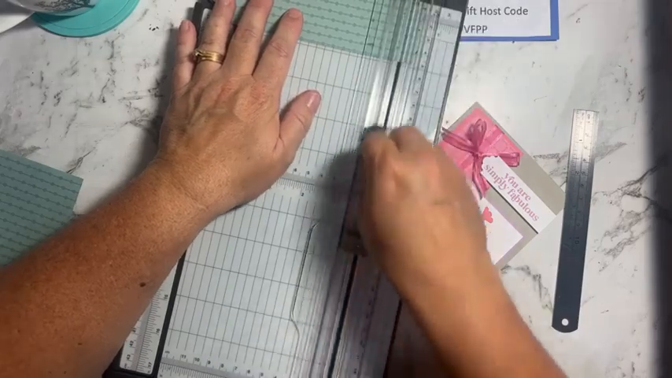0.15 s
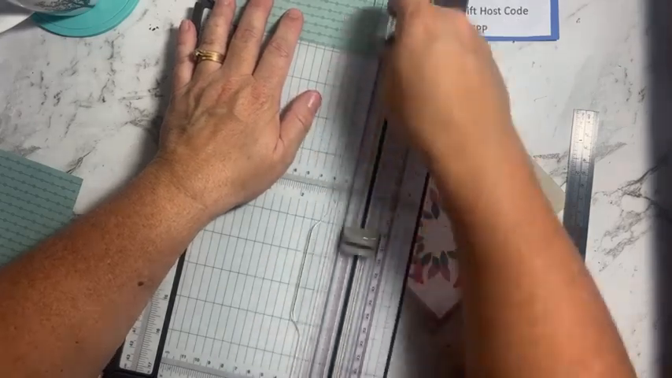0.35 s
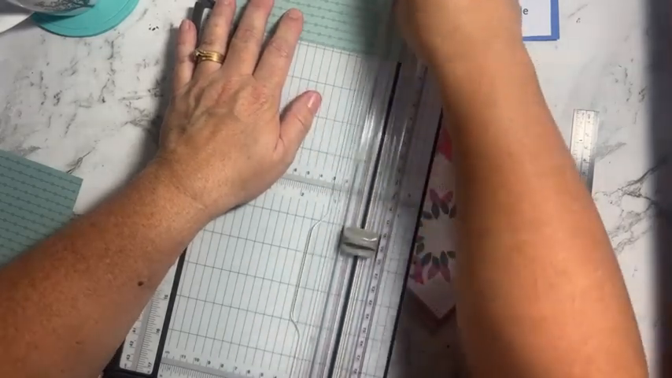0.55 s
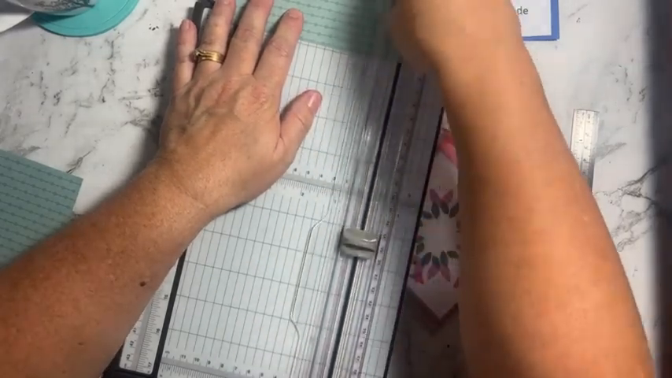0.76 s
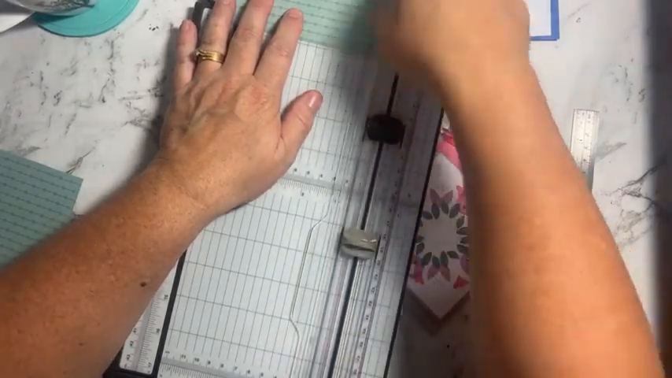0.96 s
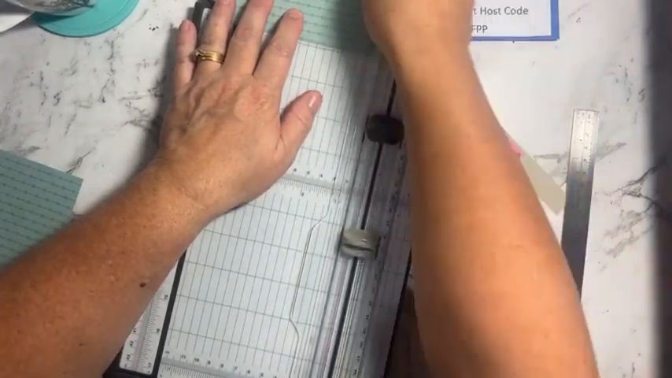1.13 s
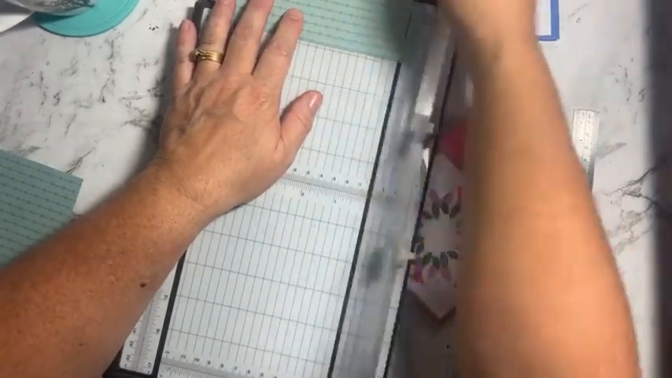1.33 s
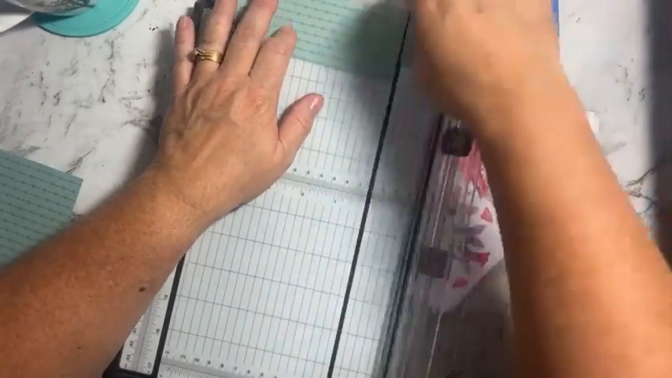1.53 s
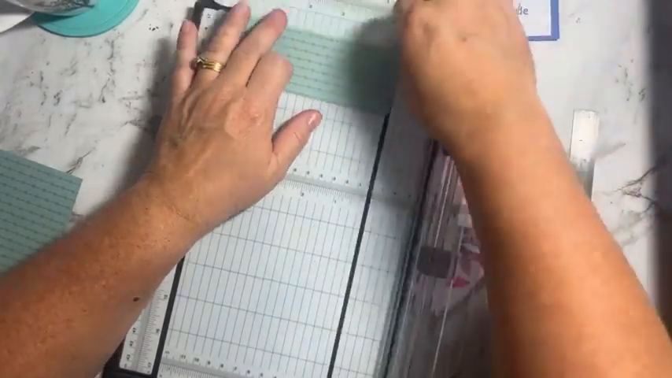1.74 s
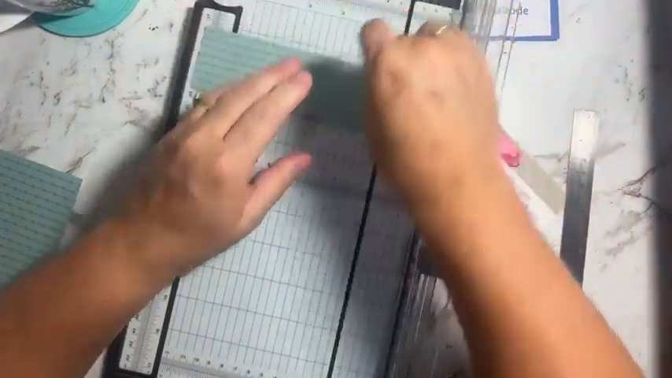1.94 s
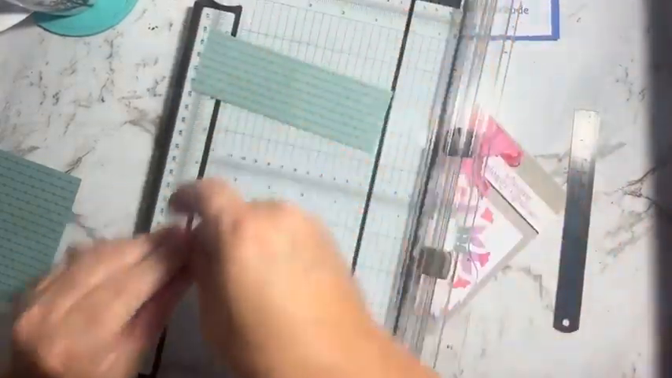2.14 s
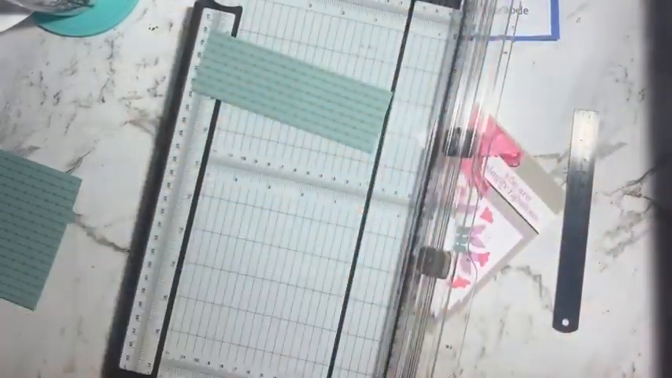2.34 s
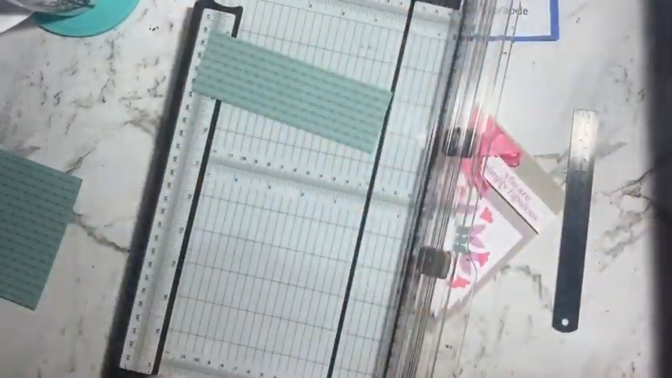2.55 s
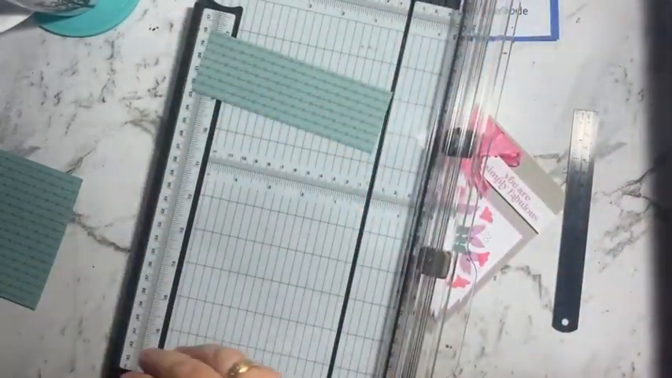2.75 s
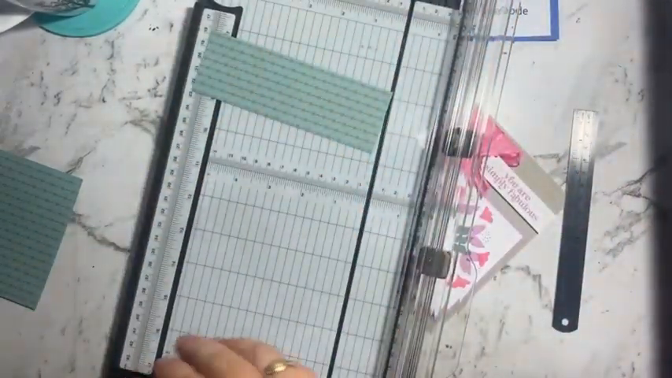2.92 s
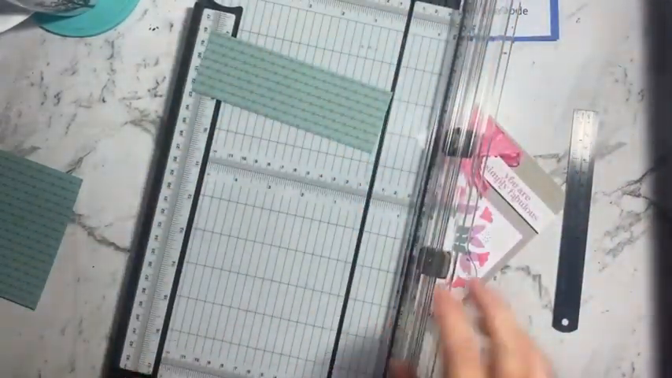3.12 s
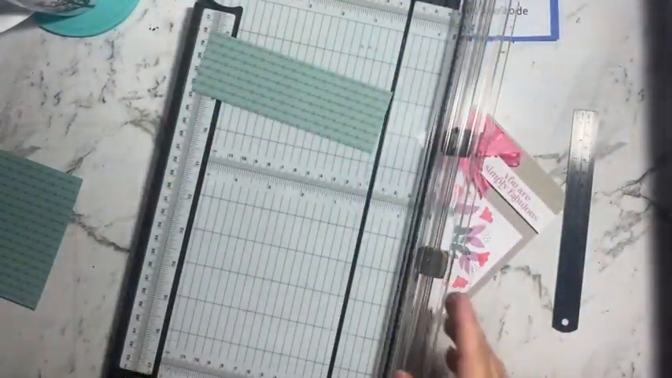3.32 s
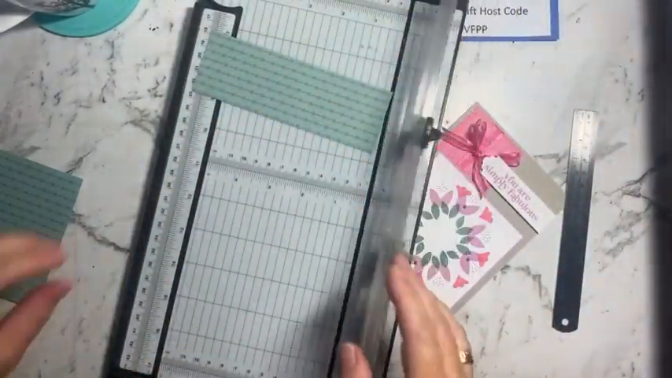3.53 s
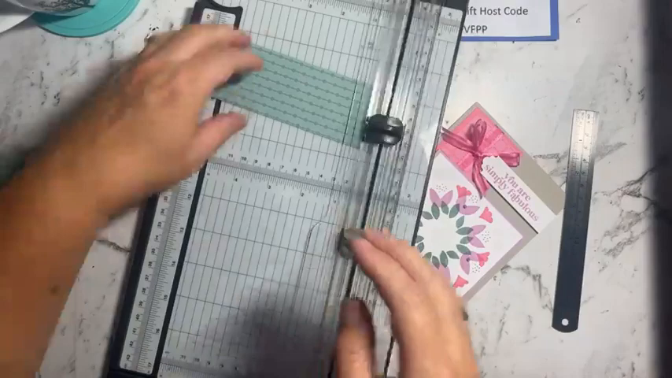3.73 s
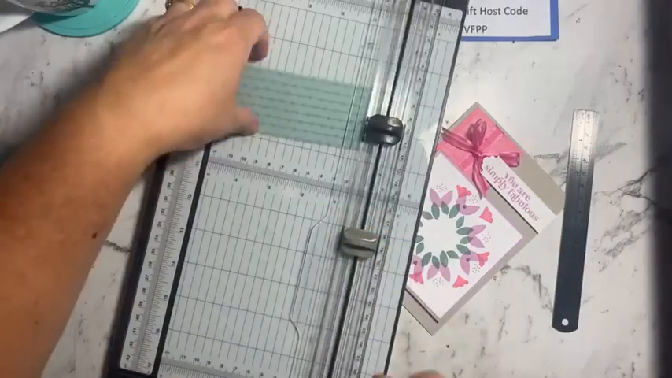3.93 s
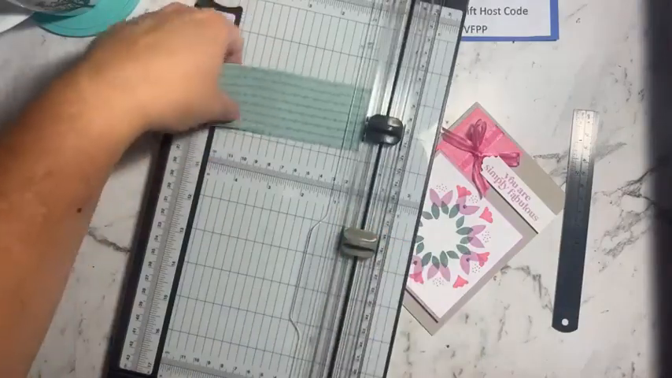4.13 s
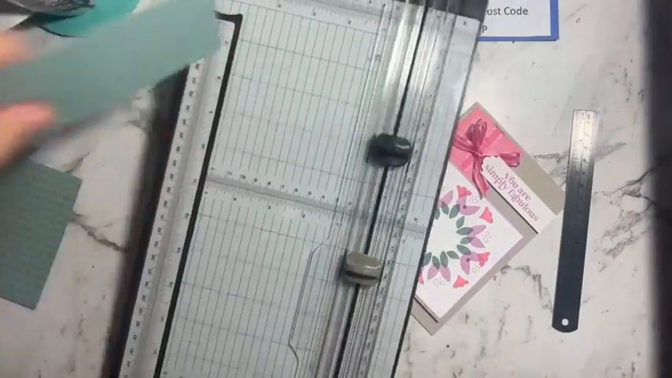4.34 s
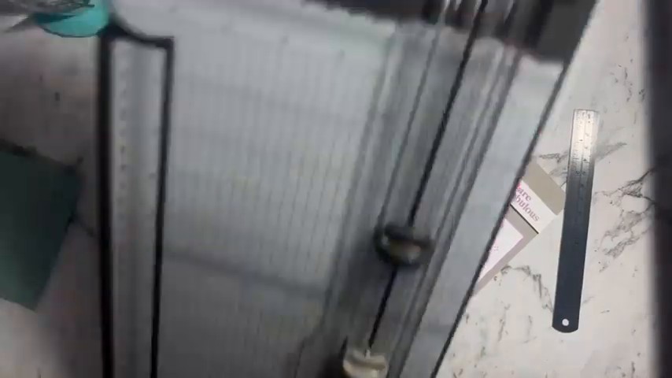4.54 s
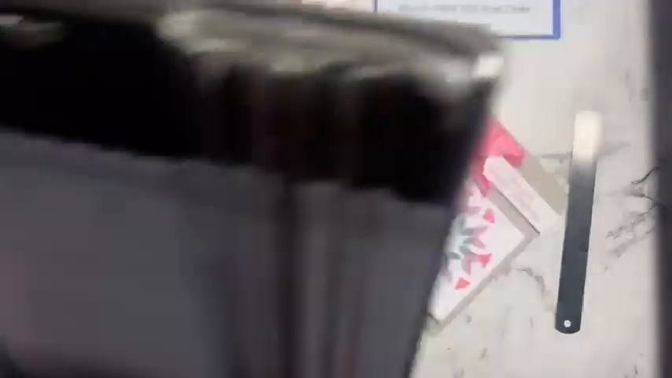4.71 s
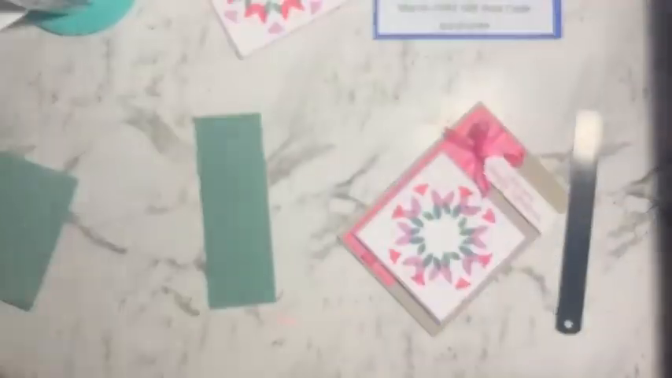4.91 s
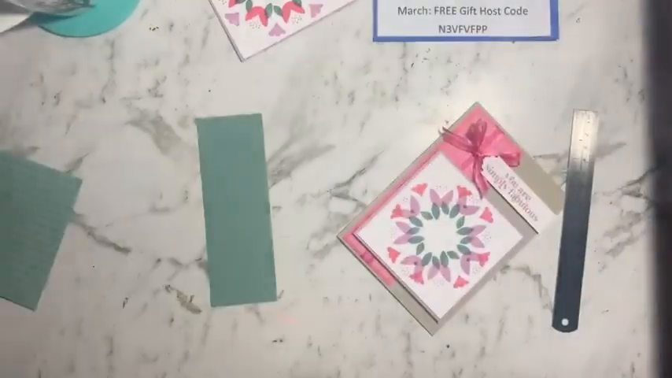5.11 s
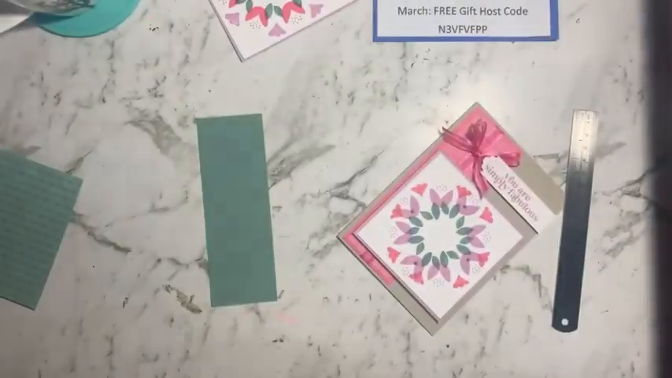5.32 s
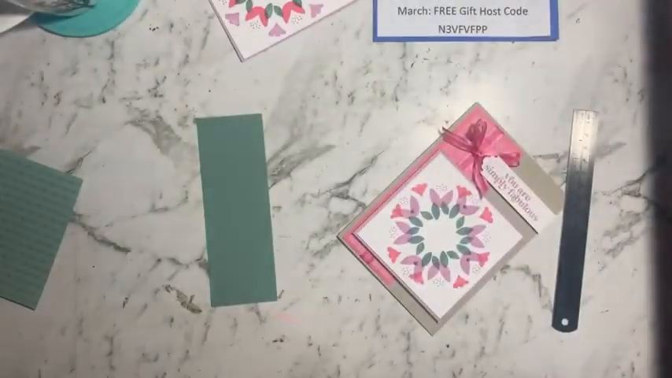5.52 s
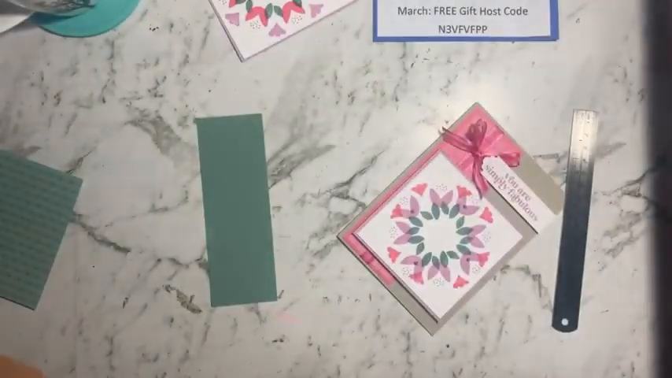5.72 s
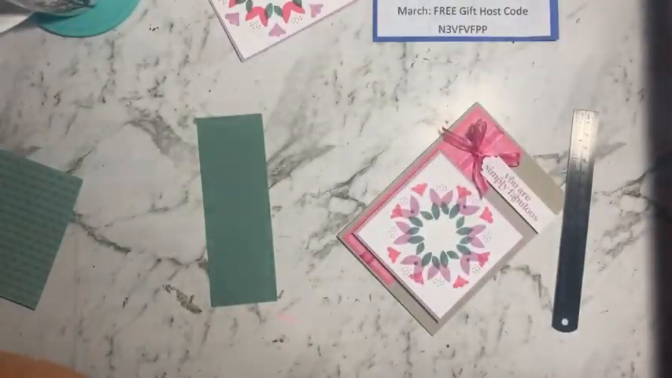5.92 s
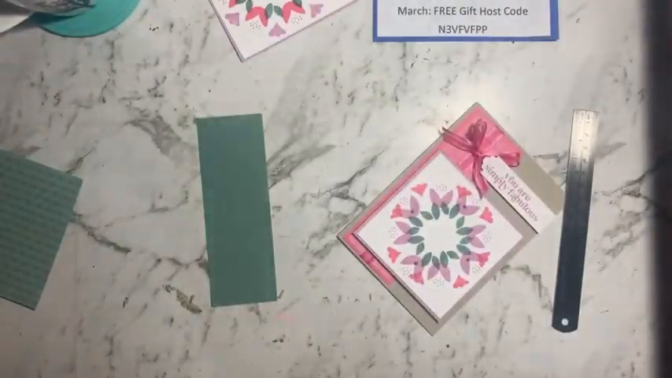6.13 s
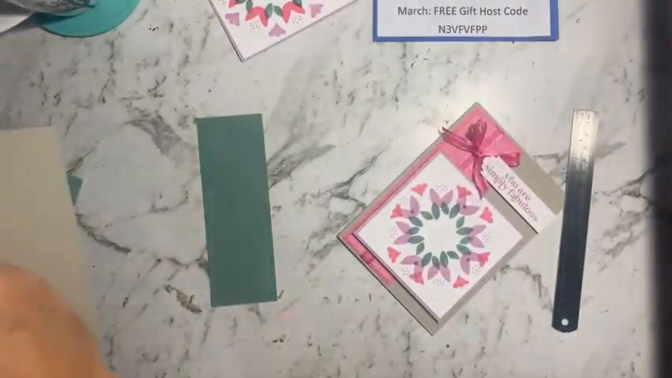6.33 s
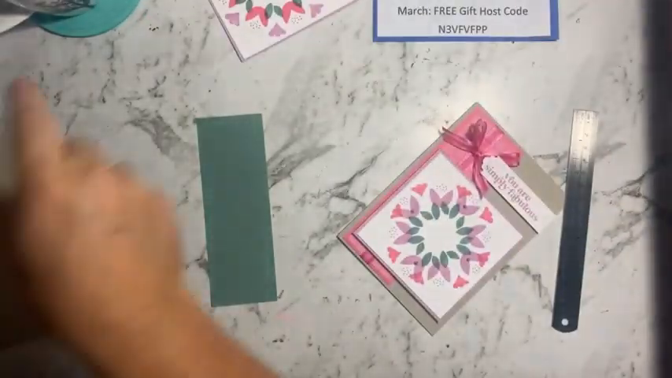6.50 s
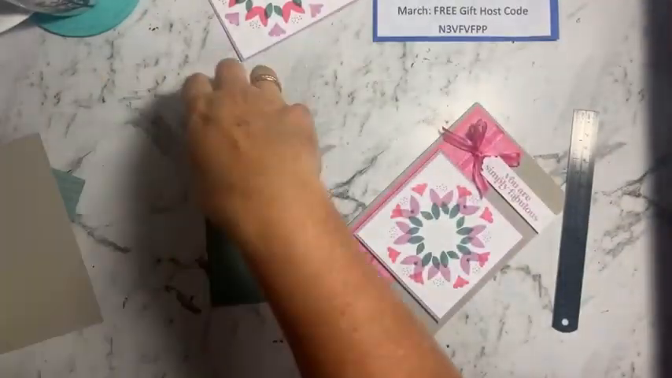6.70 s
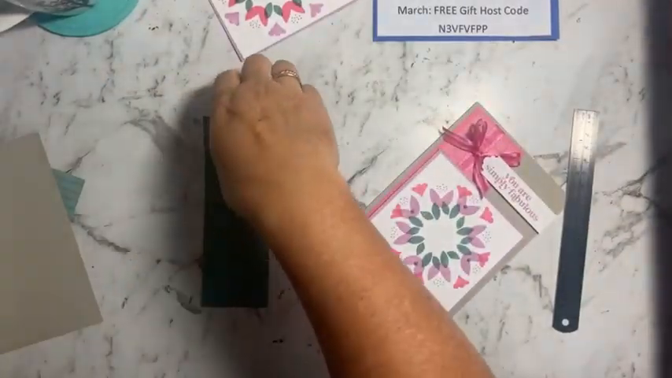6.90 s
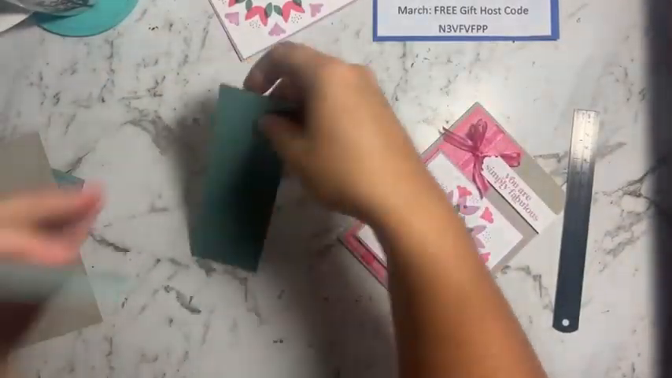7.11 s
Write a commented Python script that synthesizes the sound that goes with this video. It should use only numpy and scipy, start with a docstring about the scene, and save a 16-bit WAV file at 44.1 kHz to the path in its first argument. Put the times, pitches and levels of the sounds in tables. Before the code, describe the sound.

A trimmer blade rasps briefly through cardstock amid plastic clicks, then a sharp clack, bright snaps and loud hollow knocks on a desk.

```python
"""Paper trimmer on a desk

A small room with a faint fan hum: the blade slides up its rail and rasps through cardstock, fibre by fibre.
The plastic rail is lifted, squeaks on its hinge in unsteady tones and slaps shut; the strip is pulled away.
The trimmer is carried aside, clicks, and is put down with loud hollow knocks; hands gather the card.
Blows and friction are coloured grains that ring the board; a small microphone takes it all in.
"""
import sys
import numpy as np
from scipy import signal
from scipy.fft import rfft, irfft
from scipy.io import wavfile

SR = 44100
rng = np.random.default_rng(int(sys.argv[2]) if len(sys.argv) > 2 else 0)


def int16_out(signal):
    """Quantize to a 16-bit WAV file."""
    q = np.round(np.clip(np.atleast_2d(signal).T, -1, 1) * 32767)
    wavfile.write(sys.argv[1], SR, q.astype(np.int16))


N = 320166
TIME = np.arange(N) / SR

# blows on the plastic: (time [s], level [dB], bass [dB], hollow body [dB], strongest ring [Hz],
# rattle t60 [s], first crack [dB]); bass and body stand against the level, before a common trim
BLOWS = [(0.046, -28, -30.5, -28, 4500, 0.028, 2), (0.111, -44.5, -5, -4.5, 1200, 0.19, 7),
         (0.477, -31, -16.5, -2.5, 3670, 0.055, -1), (0.6745, -25, -19.5, -11.5, 4340, 0.07, 2.5),
         (0.7228, -29, -20, -5.5, 2720, 0.11, -2), (0.9108, -40.5, -11, 4, 890, 0.086, -5),
         (0.9887, -41, -6.5, -4, 3900, 0.093, 10), (1.035, -30, -35, -33, 3600, 0.029, 2),
         (1.0608, -21.5, -32, -3, 2700, 0.05, -10.5), (1.161, -32.5, -16, -3, 2430, 0.16, 1.5),
         (1.308, -32.5, -27, -8.5, 1200, 0.059, -3), (1.318, -30, -29, -19, 3300, 0.07, -4),
         (1.601, -41.5, -29, -13, 2240, 0.28, -2), (1.621, -17.5, -26, -12.5, 3120, 0.06, -17),
         (1.823, -35, -12.5, 3, 1340, 0.077, 5), (2.039, -54, -27, 4.5, 1960, 0.13, 6.5),
         (3.2, -45.5, -18, -12, 1170, 0.3, -9), (3.228, -38.5, -31, -6, 1140, 0.13, 2),
         (3.413, -55, -10, 1, 2000, 0.3, -9), (3.7381, -7, -30.5, -9, 3520, 0.038, 0.5),
         (3.746, -4.5, -30, -15, 5640, 0.11, 5), (4.168, -34.5, -18, -12.5, 1070, 0.071, -13),
         (4.298, -33, -21, -13, 1196, .065, 0.5), (5.561, -26.5, -35, -13, 3400, 0.13, 1),
         (5.877, -42, -0.5, 8, 443, 0.13, -3), (6.2217, -16.5, -11.5, -5.5, 3550, 0.16, -2.5),
         (6.5047, -6.5, -14, -4, 3240, 0.13, 7.5), (6.556, -16, -23, -7.5, 5140, 0.14, 7.5),
         (6.7065, -7, -12.5, -4.5, 1266, 0.12, 7.5), (6.725, -10.5, -18, -10, 1600, 0.078, -3)]


def amp(db):
    """Decibels to gain."""
    return 10 ** (np.asarray(db) / 20)


def unit(x):
    """Scales to rms 1."""
    return x / np.sqrt(np.mean(x ** 2) + 1e-20)


def read(points, hz):
    """Reads a curve on a log-frequency axis."""
    f, value = np.transpose(points)
    return np.interp(np.log(hz + 1), np.log(f + 1), value)


def add(mix, s, sound):
    """Mixes a sound in at a time in seconds."""
    part = mix[round(s * SR):][:len(sound)]
    part += sound[:len(part)]


def colour(x, points):
    """Gives a long signal a spectrum, at rms 1."""
    gain = amp(read(points, np.fft.rfftfreq(N, 1 / SR)))
    return unit(irfft(rfft(x) * gain, N))


def causal(db):
    """The minimum-phase impulse response of a dB curve over the bins."""
    log_gain = np.log(amp(np.r_[db, db[-2:0:-1]]))
    return np.fft.ifft(np.exp(np.conj(signal.hilbert(log_gain)))).real


def hump(hz, centre, octaves):
    """A bell of height 1 on a log-frequency axis."""
    return np.exp(-(np.log2((hz + 1) / centre) / octaves) ** 2)


def wander(rate_hz):
    """Slow chance at rms 1: noise kept to the lowest frequencies."""
    hz = np.fft.rfftfreq(N, 1 / SR)
    return unit(irfft(rfft(rng.standard_normal(N)) * np.exp(-(hz / rate_hz) ** 2), N))


def grains(per_s, spread_db, smooth):
    """Tiny slips of uneven size over a share of smooth friction."""
    size = amp(spread_db * np.minimum(rng.exponential(1, N), 4))
    slips = size * rng.choice([-1, 1], N) * (rng.random(N) < per_s / SR)
    return unit(slips) + smooth * rng.standard_normal(N)


def gesture(start, length, attack_s, release_s, drift_db):
    """A gain curve: attack, a hold that drifts by drift_db, then a release of 60 dB in release_s."""
    t = TIME - start
    held = np.clip(t / length, 0, 1)
    released = np.clip((t - length) / release_s, 0, 3)
    return np.clip(t / attack_s, 0, 1) * amp(drift_db * held - 60 * released)


def background():
    """Still room air is coloured noise; a fan hums as faint tones of wavering phase."""
    # the still room: (frequency [Hz], level [dB])
    air_colour = [(15, -68), (25, -41), (53, -14), (249, -22), (285, -9), (335, -37.5), (373, -15),
                  (427, -27), (1520, -39), (1940, -33), (2910, -42), (9840, -48), (13200, -40.5),
                  (16000, -60)]
    # the fan's hum: (frequency [Hz], level [dB])
    hum_tones = [(102, -89.5), (189, -60.5), (289, -63.5), (377, -61), (587, -74)]
    # the background dips briefly: (time [s], level [dB])
    brief_dip = [(2.785, -16), (2.8, -32), (2.818, -35), (2.83, -16)]
    hum = np.zeros(N)
    for hz, db in hum_tones:
        hum += amp(db) * np.sqrt(2) * np.sin(2 * np.pi * hz * TIME + 1.2 * wander(4.9))
    air = amp(-52.5) * colour(rng.standard_normal(N), air_colour)
    return (air + hum) * amp(np.interp(TIME, *np.transpose(brief_dip)))


def reflections(build_s=0.0023):
    """Dense reflections build up quickly and die band by band; energy 1."""
    # decay of the room: (frequency [Hz], t60 [s])
    room_decay = [(60, 0.16), (200, 0.29), (700, 0.3), (2000, 0.28), (5000, 0.29), (9000, 0.31),
                  (15000, 0.26)]
    taps = rng.choice([-1., 1.], SR // 2) * (rng.random(SR // 2) < 7000 / SR)
    hz, t, bands = signal.stft(taps, SR, nperseg=256)
    fade = amp(-60 * t / read(room_decay, hz)[:, None])
    tail = signal.istft(bands * fade, SR, nperseg=256)[1]
    tail *= 1 - np.exp(-(TIME[:len(tail)] / build_s) ** 2)
    return tail / np.linalg.norm(tail)


def room(x, wet_db, turn_hz, count=4):
    """Sets of dense reflections fade into one another in turn, so the room's tail stays smooth and untuned."""
    wet = np.zeros(N)
    for k in range(count):
        away = abs((TIME * turn_hz * count - k) % count - count / 2)
        share = np.cos(np.pi / 2 * np.minimum(away, 1))
        wet += signal.oaconvolve(x * share, reflections())[:N]
    return x + amp(wet_db) * wet


def ring(x, mode_db):
    """Sound passes through the board, whose modes ring on."""
    # modes of the trimmer's board and rail: (frequency [Hz], level before mode_db [dB], t60 [s])
    board_modes = [(124, -7.5, 0.66), (215, -10, 0.071), (302, -4.5, 0.1), (589.5, 6.5, 0.17),
                   (694, 4, .22), (874, -14, 0.55), (934, 3.5, 0.07), (1127, -0.5, 0.083), (1277, 0, 0.022),
                   (1645, -1, 0.36), (2314, 1, .16), (2776, -11.5, .18), (3182, -11.5, 0.28),
                   (3740, -8, 0.019), (3370, -11.5, 0.097), (4170, -2.5, 0.14), (4600, -5.5, 0.23),
                   (5481, -3, .22), (5760, 4.5, .22), (6900, -11, 0.072)]
    t = np.arange(SR // 3) / SR
    body = np.zeros(len(t))
    for hz, db, t60 in board_modes:
        body += amp(mode_db + db - 60 * t / t60) * np.cos(2 * np.pi * hz * t) / (t60 * SR)
    body[0] += 1  # the direct sound
    return signal.oaconvolve(x, body)[:N]


def bumps(t60=0.12, rise_s=0.003):
    """A padded push, or the weight of a blow, sets a few low, well damped modes of the desk swinging."""
    # the hand presses the board onto the desk: (time [s], level before the partials' gains [dB], pitch [Hz])
    hand_presses = [(0.731, -42.5, 80), (1.236, -35.5, 104.4), (1.262, -42, 188), (1.778, -40, 115),
                    (1.829, -45.5, 86), (3.945, -45.5, 123), (6.3, -40, 126)]
    partials = [(0.57, -3), (1, 7), (1.45, -11.5), (2.1, -14)]  # (multiple of the pitch, dB)
    thump_db, thump_hz, lag_s = -5, 110, 0.023  # the bass of every blow swings the desk just after it
    out, t = np.zeros(N), np.arange(SR // 3) / SR
    thumps = [(s + lag_s, db + bass + thump_db, thump_hz) for s, db, bass, *_ in BLOWS]
    for s, db, hz in list(hand_presses) + thumps:
        swing = sum(amp(part_db) * np.sin(2 * np.pi * hz * ratio * t) for ratio, part_db in partials)
        add(out, s, amp(db - 60 * t / t60) * (1 - np.exp(-t / rise_s)) * swing)
    return out


def squeak(jitter=0.024, rough_db=3, rasp_db=3):
    """The hinge slips at a fast, unsteady rate; its overtones rasp as it breaks loose."""
    # slips of the hinge as the rail swings down:
    # (start [s], length [s], pitch [Hz], level [dB], overtones at the start [dB])
    hinge_slips = [(3.457, 0.15, 1440, -65, -22), (3.534, .04, 1490, -52.5, -4.5),
                   (3.59, .03, 1660, -52, -24), (3.666, .012, 1620, -64, -24)]
    attack_s, release_s, swell_db = 0.0094, 0.05, 7.5
    dulling = 120.5  # dB per s: overtones die away once the hinge is moving
    out, clock = np.zeros(N), np.cumsum(1 + jitter * wander(300)) / SR
    rasp = amp(rasp_db * wander(130) + 1.0)
    for start, length, hz, db, bright_db in hinge_slips:
        phase = 2 * np.pi * hz * clock
        bright = amp(bright_db - dulling * np.clip(TIME - start, 0, length))
        low = np.sin(2 * phase) + amp(-13) * np.sin(3 * phase)
        high = amp(-4) * np.sin(4 * phase) + amp(-18) * np.sin(5 * phase)
        overtones = low + bright * high  # the high ones fade twice as fast
        slip = gesture(start, length, attack_s, release_s, swell_db)
        out += amp(db) * slip * (np.sin(phase) + bright * overtones * rasp)
    return out * amp(rough_db * wander(120))


def scuffs(octaves=0.6):
    """Short swells of grainy friction, each in its own band."""
    # fingers and card scuff over the board:
    # (time of the peak [s], level [dB], centre [Hz], time from the peak to 1/e [s])
    scuff_swells = [(2.12, -74.5, 1610, 0.23), (2.24, -68, 11900, 0.066), (2.47, -73.5, 12200, 0.052),
                    (3.946, -55, 990, 0.018), (4.37, -63, 1390, 0.05), (4.926, -61.5, 5000, 0.025),
                    (5.667, -40.5, 5570, 0.0059), (6.93, -49, 7070, .004)]
    out, slips = np.zeros(N), grains(3500, 2.8, 0.7)
    t, hz = np.arange(SR // 2) / SR - 1 / 4, np.fft.rfftfreq(SR // 2, 1 / SR)
    for s, db, centre, length in scuff_swells:
        stretch = np.roll(slips, -round(s * SR))[:len(t)]
        friction = unit(irfft(rfft(stretch) * hump(hz, centre, octaves)))
        add(out, s + t[0], amp(db) * friction * np.exp(-(t / length) ** 2))
    return out


def slides(rub_db=-2, rumble_db=-3, hiss_db=-2):
    """Uneven stick and slip: plastic rubs, the desk rumbles, paper hisses."""
    # sliding strokes of carriage, card or fingers: (start [s], length [s], plastic rub [dB],
    # desk rumble [dB], paper hiss [dB]); the three levels stand before this function's trims
    sliding_strokes = [(0, 0.01, -43.5, -50, -56), (0.036, 0.4, -59, -65, -70),
                       (.78, 0.25, -60, -59.5, -93), (0.9, 0.23, -65, -61, -60),
                       (1.225, 0.15, -53.5, -52.5, -58), (1.407, 0.49, -56.5, -57, -70),
                       (1.976, 0.018, -66, -57, -54), (2.037, 0.21, -70.5, -62, -85),
                       (2.256, 0.19, -81, -64.5, -73), (2.464, .11, -71, -65, -68),
                       (3.908, 0.25, -64.5, -58, -68), (4.145, 0.27, -60.5, -57, -59.5),
                       (4.619, 0.14, -77.5, -70, -75), (4.711, 0.51, -68, -62.5, -74),
                       (5.289, 0.037, -66.5, -61, -66), (5.436, .09, -64, -80, -64),
                       (5.541, 0.033, -45, -60, -56), (5.833, 0.11, -60, -58.5, -55),
                       (6.033, 0.182, -73, -66, -85.5), (6.313, 0.08, -55.5, -48.5, -83.5),
                       (6.862, 0.36, -69, -64.5, -53.5)]
    # plastic rubbing: (frequency [Hz], level [dB])
    rub_colour = [(150, -21), (500, 0.5), (1100, -0.5), (2300, 7), (3000, -0.5), (3900, -1.5), (6200, -8),
                  (8000, -24.5), (16000, -52)]
    # the desk's rumble: (frequency [Hz], level [dB])
    rumble_colour = [(25, -32), (50, -5), (70, -3.5), (120, -2.5), (220, -8), (450, -8), (900, -15),
                     (3000, -51.5)]
    # the paper's hiss: (frequency [Hz], level [dB])
    hiss_colour = [(1500, -16), (4000, 2), (6500, 4), (9000, 0.5), (12000, -6), (16000, -0.5)]
    rise_share = 0.25  # a stroke gathers speed over this share of its length
    release_s, drift_db = 0.24, -4  # then it eases off and stops
    slips = grains(1800, 2.4, 0.75) * amp(3.0 * wander(30))
    rub = amp(rub_db) * colour(slips, rub_colour)
    rumble = amp(rumble_db) * colour(slips, rumble_colour)
    hiss = amp(hiss_db) * colour(slips, hiss_colour)
    out = np.zeros(N)
    for start, length, *levels in sliding_strokes:
        push = gesture(start, length, rise_share * length, release_s, drift_db)
        out += push * sum(amp(db) * voice for db, voice in zip(levels, (rub, rumble, hiss)))
    return out


def snaps(click_db=11):
    """Small stiff parts snap home: one sharp click, then a short bright tail of dying contacts."""
    # sharp snaps of the rail and its sliders: (time [s], level [dB], pitch [Hz], t60 [s], tick [dB])
    rail_snaps = [(5.019, -7, 4370, 0.014, -27.5), (5.0669, -15, 3830, 0.022, -6.5),
                  (5.6695, -14, 3560, 0.079, -8.5)]
    # colour of the tick: (frequency [Hz], level [dB])
    tick_colour = [(50, -51), (180, -21), (350, -10), (800, -7), (1300, -3.5), (2200, 2.5), (6000, 9),
                   (8000, -0.5), (11000, -8.5), (13500, -6), (16000, -18)]
    # slight humps in the colour: (multiple of the pitch, width [octaves], height [dB re a 1 dB hump])
    snap_humps = [(0.481, 0.18, -10), (1.001, 0.15, -0.5), (1.42, 0.22, -32)]
    out, t, hz = np.zeros(N), np.arange(SR // 6) / SR, np.fft.rfftfreq(2048, 1 / SR)
    for s, db, pitch, t60, tick in rail_snaps:
        humps = sum(amp(height) * hump(hz, pitch * ratio, width) for ratio, width, height in snap_humps)
        contact = rng.choice([-1, 1], len(t)) * amp(-60 * t / t60)
        contact[0] = amp(click_db)
        spectrum = tick + 6.02 + read(tick_colour, hz) + humps
        add(out, s, amp(db) * signal.fftconvolve(contact, causal(spectrum)))
    return out


def blade():
    """Card fibres break one after another under the blade, so densely that they blend into an even rasp."""
    # card under the blade: (frequency [Hz], level [dB])
    card_colour = [(30, -31), (60, 6), (150, -17), (300, -11.5), (700, -10), (1100, -9), (2000, -7),
                   (3000, -2.5), (4000, -1.5), (6000, -6.5), (8000, -14), (11000, -21), (13500, -14),
                   (16000, -21)]
    # one pass of the blade through the card
    push = amp(-45.5) * gesture(start=0.474, length=0.195, attack_s=0.047, release_s=0.18, drift_db=-1.5)
    fibres = grains(5000, 2.2, 0.55) * amp(0.7 * wander(60))
    return push * colour(fibres, card_colour)


def blows(crack_t60=0.016, rise_s=0.0042, graze_t60=0.037, peak_db=5, peak_octaves=0.5):
    """Parts graze, meet with a crack, then rattle; each blow's bass, body and ring set its colour."""
    # colour of a blow: (frequency [Hz], level [dB])
    plastic_colour = [(25, -28.5), (45, -14.5), (65, 4.5), (110, 6), (200, 5.5), (400, 1), (750, 1.5),
                      (1500, -1.5), (2200, -2), (3400, -2.5), (5800, -4), (7500, -5.5), (10000, -9),
                      (15000, -15.5)]
    graze_db = -17.48  # parts brush against each other just before they meet
    bass_trim_db, body_trim_db = 10, 4
    full_treble_db, treble_per_db = -2, 0.36  # harder blows are brighter: at 0 dB, and per dB of level
    out, hz = np.zeros(N), np.fft.rfftfreq(4096, 1 / SR)
    t = np.arange(-SR // 30, SR // 3) / SR  # 0 is the moment of contact
    chatter = unit(grains(5000, 6.2, 0.8))
    for s, db, bass, body, pitch, t60, crack_db in BLOWS:
        rattle = amp(-60 * abs(t) / t60) * (1 - np.exp(-abs(t) / rise_s))
        crack = amp(crack_db - 60 * abs(t) / crack_t60)
        graze = amp(graze_db - 60 * abs(t) / graze_t60)
        force = np.where(t < 0, graze, crack + rattle)
        contacts = chatter[round(s * SR):][:len(t)] * force
        low, hollow = bass + bass_trim_db, body + body_trim_db
        treble = full_treble_db + treble_per_db * db
        tilt = read([(170, low), (450, hollow), (850, hollow), (1600, 0.003), (6000, 0), (9500, treble)], hz)
        peak = peak_db * hump(hz, pitch, peak_octaves)
        spectrum = read(plastic_colour, hz) + tilt + peak
        add(out, s + t[0], amp(db) * signal.fftconvolve(contacts, causal(spectrum)))
    return out


def scene():
    """Blows, blade, slides and scuffs ring the board; they, snaps, bumps and squeak sound in the room."""
    contacts = blows() + blade() + slides() + scuffs()
    trimmer = ring(room(contacts, wet_db=-2.0, turn_hz=30.28), mode_db=22.0)
    small_parts = room(snaps(), wet_db=-1.0, turn_hz=60)
    tones = room(bumps() + squeak(), wet_db=-2.5, turn_hz=14)
    return (trimmer + small_parts + tones + background())[None]


def record(dry, low_cut_hz=52, edge_hz=16200, ceiling=0.94):
    """The small microphone loses the deepest bass; peaks round off near full scale; then the band limit."""
    thin = signal.sosfilt(signal.butter(4, low_cut_hz, "highpass", fs=SR, output="sos"), dry)
    rounded = ceiling * np.tanh(thin / ceiling)
    band_limit = signal.firwin(511, edge_hz, window=("kaiser", 9), fs=SR)
    return signal.oaconvolve(rounded, band_limit[None], "same")


dry = scene()
out = record(dry)
int16_out(out)
```